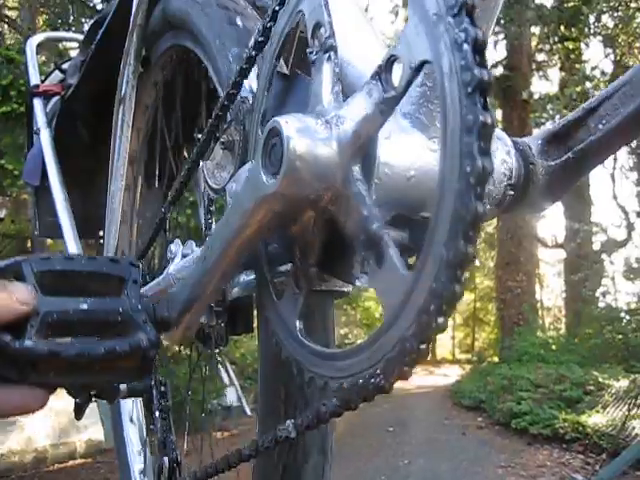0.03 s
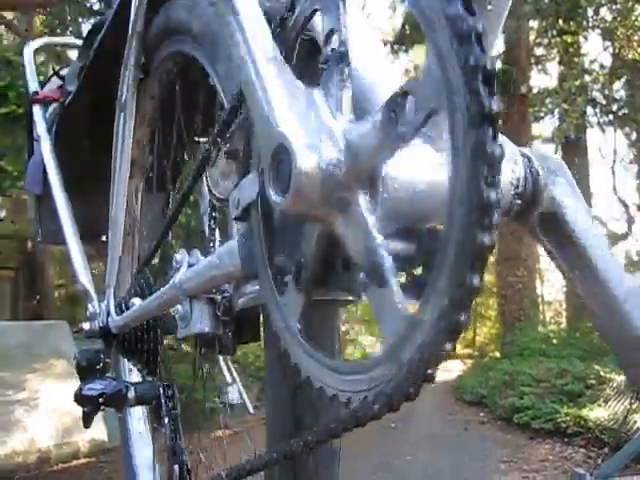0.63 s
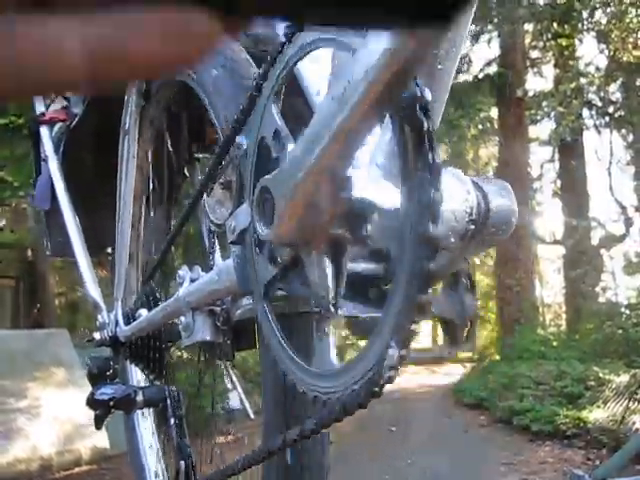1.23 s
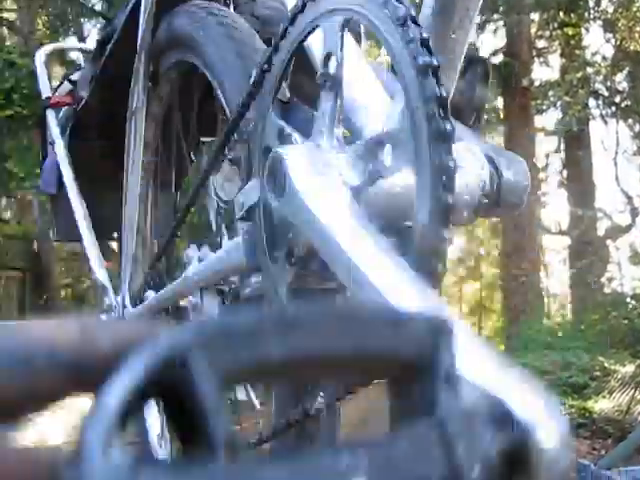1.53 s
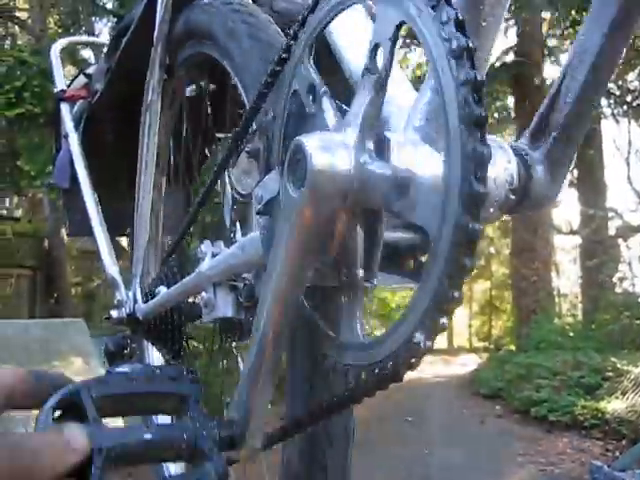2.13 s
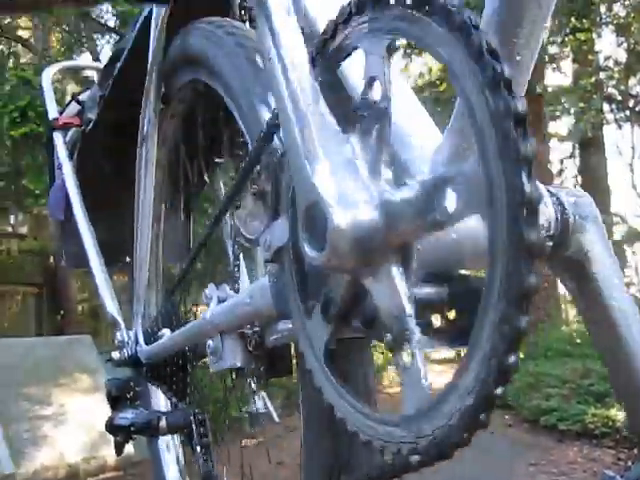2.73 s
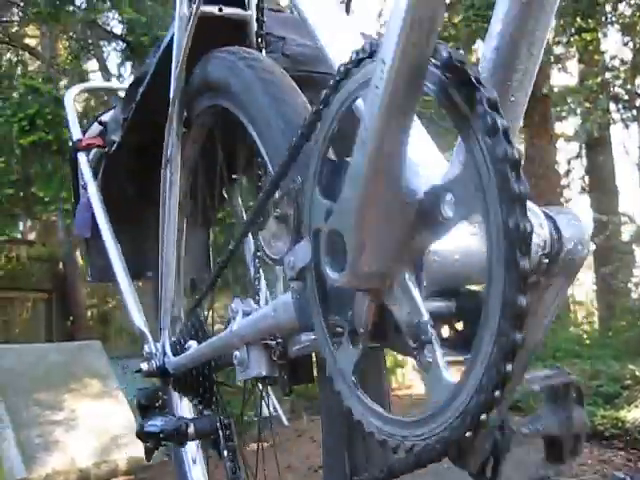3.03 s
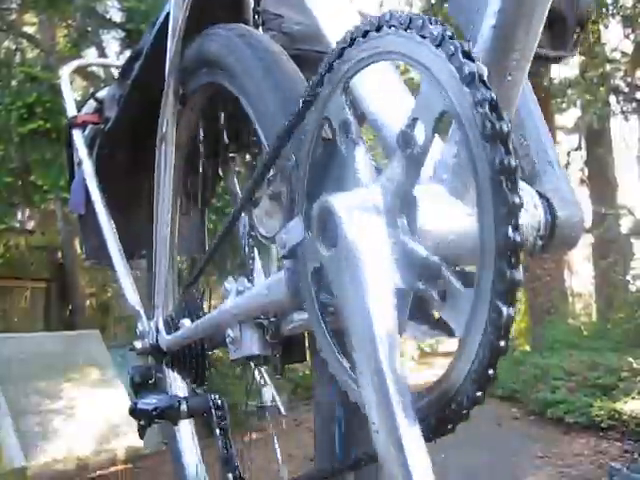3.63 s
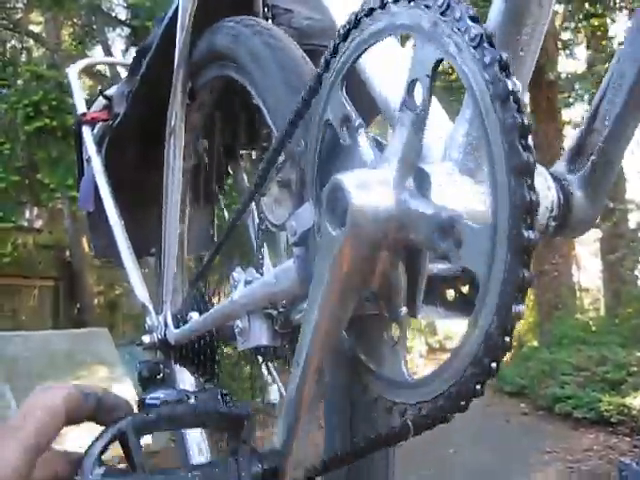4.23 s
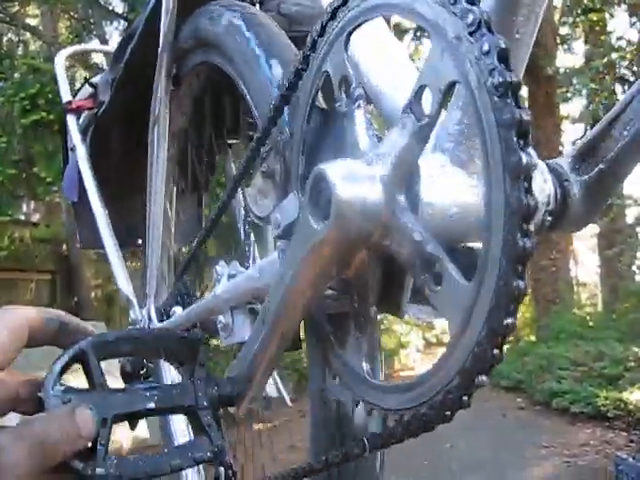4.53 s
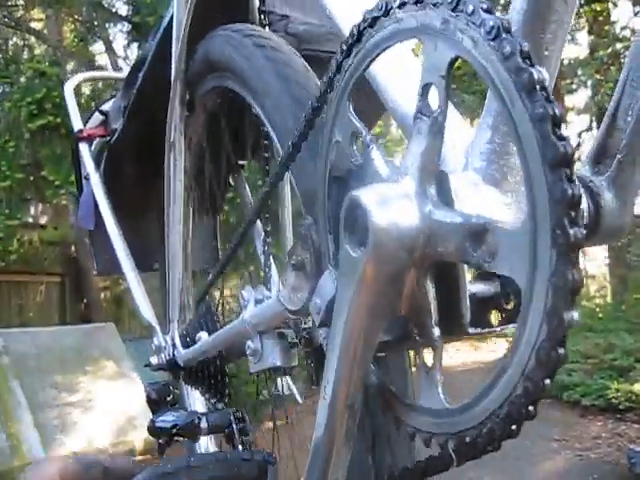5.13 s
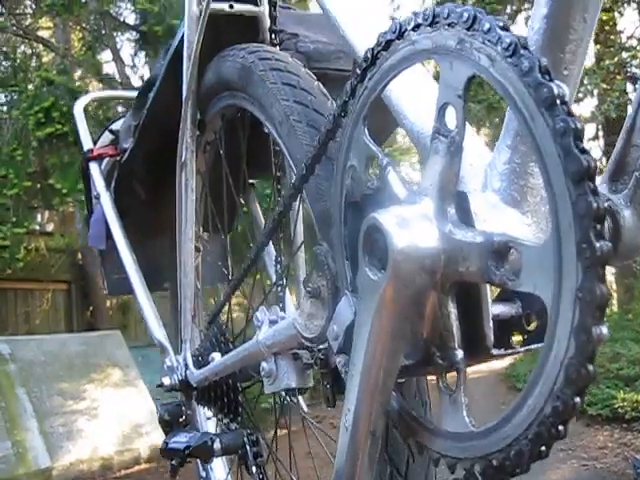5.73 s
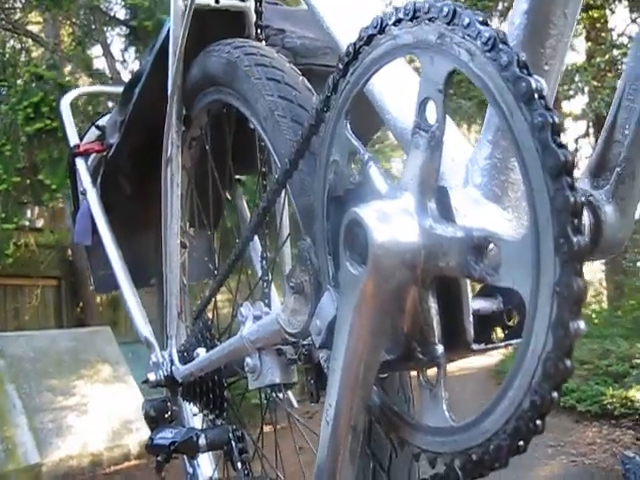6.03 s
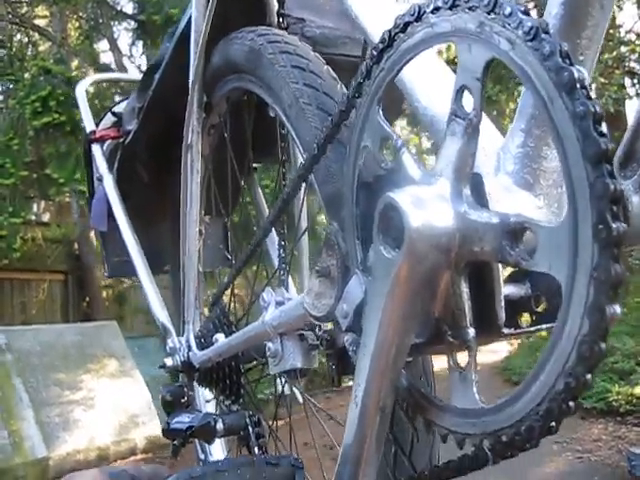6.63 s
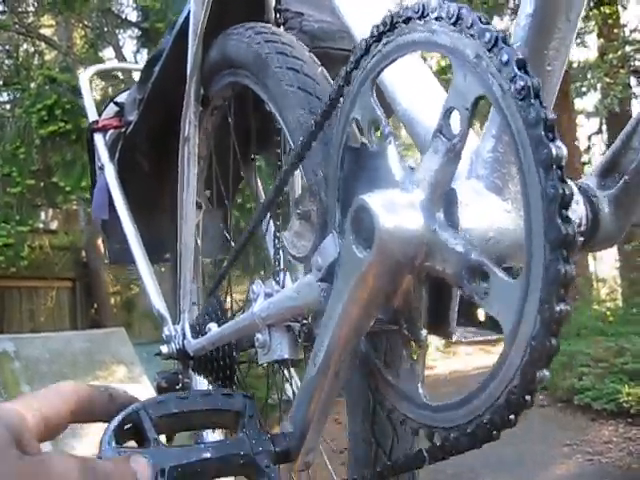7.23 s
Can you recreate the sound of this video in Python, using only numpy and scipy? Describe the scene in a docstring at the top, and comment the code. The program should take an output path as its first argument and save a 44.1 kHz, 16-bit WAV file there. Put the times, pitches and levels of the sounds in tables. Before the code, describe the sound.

A bicycle crank is turned by hand outdoors, close to the microphone. The chain hisses over the sprockets and rattles unevenly against the frame, with an occasional sharp click. It slows and stops as the freewheel snaps tooth by tooth. After a short pause the pedal gives a dry creak, the freewheel clicks again and the chain starts to creep. Soft open air lies underneath.

```python
"""A bicycle chain hisses over its sprockets and rattles the frame as a hand turns the crank.
The bicycle is on a stand, outdoors. The chain slows, and the freewheel's pawls (small spring catches)
snap over their teeth one by one. After a pause the pedal creaks under a new push, sticking and
slipping; the pawls snap again and the chain starts to creep. Soft open air lies behind it all."""
import sys
import numpy as np
from scipy import signal
from scipy.fft import rfft, irfft
from scipy.io import wavfile
from scipy.ndimage import uniform_filter1d

SR = 44100
rng = np.random.default_rng(int(sys.argv[2]) if len(sys.argv) > 2 else 0)


def log_audio(samples):
    """Write samples as a 16-bit WAV file to the path given in sys.argv[1]."""
    # one column per channel
    frames = np.atleast_2d(samples).T
    # limit to full scale, then quantise
    limited = np.clip(frames, -1, 1)
    pcm = np.round(limited * 32767).astype(np.int16)
    wavfile.write(sys.argv[1], SR, pcm)


N = 330309
T = np.arange(N) / SR

# Levels are relative: the functions add their own gains. ring_s is the time to fade by 60 dB.
# tone of the open air: pitch_hz, level_db
AIR_TONE = [(25, -6), (70, -5.5), (150, -1.5), (400, -4.5), (800, -4), (1500, -10.5), (3000, -13.5),
            (6000, -19), (10000, -20.5), (15500, -30.5)]
# the hand shifts on the pedal: start_s, level_db, length_s
GRIPS = [(4.735, -37.5, 0.032), (7.082, -34.5, 0.022)]
# tone of rubbing fingers: pitch_hz, level_db
GRIP_TONE = [(60, -40), (170, 3.5), (450, 3), (1000, 4), (2200, -2.5), (5000, -19), (16000, -39)]
# slips of the loaded pedal: start_s, level_db, focus_hz (pitch driven most), push_db (added to level)
CREAKS = [(6.5896, -20.5, 2320, -9), (6.6386, -24, 4130, 1), (6.6567, -21.5, 1510, -8),
          (6.6737, -27, 3700, -19), (6.6763, -16, 3640, -27), (6.701, -17, 3470, -12),
          (6.7036, -23, 3700, -21), (6.7228, -27, 4100, -6), (6.7247, -7, 4430, -13.5),
          (6.7289, -6, 4050, -14), (7.1182, -23, 3670, -21)]
# notes the pedal and crank ring with: pitch_hz, level_db, ring_s
PEDAL_NOTES = [(1466, 7, 0.017), (1800, -5, 0.033), (2365, 4.5, 0.0095), (2580, -0.5, 0.012),
               (2980, -13, 0.0093), (3476, -5, 0.028), (3720, 6.5, 0.0079), (4020, 9, 0.0051),
               (4590, -6, 0.013)]
# tone of the dull push on the crank: pitch_hz, level_db
PUSH_TONE = [(60, -28), (200, -24), (450, -5), (1000, -6), (1420, 7.5), (2000, -9), (5000, -36),
             (16000, -59)]
# pawls and gear teeth snap: start_s, level_db, tilt_db_per_octave, clank_hz
SNAPS = [(0.2745, -16.5, -1, 3240), (2.4033, -15.5, -2.5, 2260), (2.444, -19, 0.5, 4030),
         (3.5036, -17, -4.5, 1810), (4.9807, -18, -4, 1750), (5.0316, -16.5, -2, 1920),
         (5.4231, -20.5, -0.5, 2744), (5.4755, -34.5, -5.5, 2200), (5.586, -21, -5, 2160),
         (5.6506, -16, 3.5, 2270), (5.7253, -16.5, -0.5, 2080), (5.8019, -24, -4, 2480),
         (6.9100, -18, -1.5, 2030), (6.964, -22.5, -5, 1730), (7.1786, -15, -0.5, 2060)]
# tone of one snap: pitch_hz, level_db
SNAP_TONE = [(60, -43), (250, -29), (600, -19), (1300, -9), (2100, 0), (3400, -2), (4400, -3), (5900, 0),
             (7000, -5.5), (9300, -4), (12000, -14.5), (16000, -21)]
# notes of a pawl landing on the ratchet: pitch_hz, level_db, ring_s
PAWL_NOTES = [(1917, -2.5, 0.017), (2280, 3.5, 0.01), (3235, 0.5, 0.011), (6150, 4, 0.0047)]
# notes of the rear hub and sprockets: pitch_hz, level_db, ring_s
HUB_NOTES = [(419, -2, 0.076), (637, 0, 0.085), (861, 6.5, 0.08), (1720, 4.5, 0.1), (1840, -17, 0.088),
             (2235, -11.5, 1.25), (2910, 13, 0.033), (3380, -15, 0.045), (4020, 5.5, 0.054),
             (6140, 5, 0.055)]
# single links drop hard onto the front sprocket: start_s, level_db
LINK_DROPS = [(.861, -34), (1.511, -32.5), (2.372, -29), (3.8, -33), (4.315, -35.5), (4.371, -36),
              (4.734, -32), (4.906, -44), (7.314, -39), (7.355, -35), (7.406, -34)]
# a quick, even ticking is heard while the hiss is low: start_s, end_s, ticks_per_s
TICK_SPELLS = [(4.562, 5.16, 34.7), (7.225, 7.35, 37)]
# tone of a link settling on a tooth: pitch_hz, level_db
LINK_TONE = [(1000, -9.5), (4800, -3), (6000, 7.5), (7000, -6), (11000, 0), (12800, -6), (15000, -17)]
# the hardest knocks of slack links on the gear changer: start_s, level_db
KNOCKS = [(0.078, -26), (0.194, -28.5), (0.38, -29), (0.53, -32), (0.959, -22.5), (1.094, -26),
          (1.234, -31.5), (1.349, -27.5), (1.398, -28.5), (1.512, -25), (1.644, -28.5), (2.13, -28.5),
          (2.298, -29), (2.685, -26.5), (2.749, -26), (2.941, -22.5), (3.212, -24), (3.256, -25.5),
          (3.403, -29), (3.695, -25), (3.836, -25), (3.93, -26.5), (4.007, -21.5), (4.054, -26.5),
          (4.336, -24.5), (4.41, -28.5), (4.459, -28.5), (4.681, -23), (4.918, -26.5), (5.227, -27.5),
          (7.309, -33)]
# where the frame and gear changer ring: pitch_hz, width_hz, level_db
FRAME_PEAKS = [(178, 11.4, -3.5), (399.6, 32, -2), (614, 75, -2.5), (826, 92, -0.5), (1101, 49, 7),
               (1315, 71, 5), (1713, 206, 1), (1846, 17, 5.5), (1870, 23, 2), (2011, 130, 1), (2277, 29, 2)]
# the chain scrapes harder along a steel plate: peak_s, level_db, half_length_s
SCRAPES = [(.2, -42, .04), (0.47, -37.5, .055), (.68, -38.5, 0.056), (2.465, -36, 0.036), (2.7, -44.5, .13)]
# where that plate rings: pitch_hz, width_hz, level_db
PLATE_PEAKS = [(3923, 140, 10.5), (4260, 270, -9), (6760, 260, -5), (12100, 400, -14), (14100, 360, -13)]
# swishes as the chain slides harder: start_s, level_db, length_s
SWISHES = [(.15, -33.5, 0.051), (1.33, -39, 0.089), (1.72, -38.5, 0.086), (3.77, -40, .05),
           (4.685, -36, 0.026), (5.17, -42.5, 0.043), (6.972, -44, .02), (7.375, -36.5, 0.018)]
# tone of the chain's rubbing rollers: pitch_hz, level_db
HISS_TONE = [(100, -22.5), (170, 0), (300, -6), (1200, -10), (2600, -0.5), (3500, 0), (4400, 2),
             (7000, 0.5), (9300, -1.5), (10500, -2), (13300, -10), (14100, -15), (14800, -41),
             (16000, -1.5)]
# the chain runs, then slows to a stop: time_s, hiss_db, rattle_db
CHAIN_RUN = [(0.039, -39, -44.5), (0.32, -39, -47), (0.66, -37, -44), (0.8, -40.5, -43), (1.24, -42, -41.5),
             (1.8, -39.5, -41), (2.3, -39, -41.5), (2.49, -33.5, -39), (2.9, -39, -40.5),
             (3.23, -37, -37.5), (3.54, -40.5, -38.5), (4.0, -41, -40), (4.9, -70, -39),
             (5.24, -55.5, -41.5), (5.36, -91, -83)]
# the chain creeps on under the new push: time_s, hiss_db, rattle_db
CHAIN_CREEP = [(6.98, -49.5, -51), (7.096, -77, -57), (7.234, -58.5, -46.5), (7.32, -56, -47),
               (7.49, -43.5, -49.5)]
HISS_COLUMN, RATTLE_COLUMN = 1, 2


def amp(db):
    """Turns decibels into a gain to multiply by."""
    return 10 ** (np.asarray(db) / 20)


def unit_power(x):
    """Scales a signal to an average power of one."""
    return x / np.sqrt(np.mean(x ** 2) + 1e-20)


def add(mix, start_s, sound):
    """Mixes a sound in at the given time."""
    part = mix[round(start_s * SR):][:len(sound)]
    part += sound[:len(part)]


def colour(x, tone, size=4096):
    """Filters a sound to the given tone; white noise keeps its power."""
    hz, db = np.transpose(tone)
    bin_hz = abs(np.fft.fftfreq(size, 1 / SR)) + 1
    log_gain = np.log(amp(np.interp(np.log(bin_hz), np.log(hz), db)))
    response = np.exp(np.conj(signal.hilbert(log_gain)))  # rings after a hit, never before
    taps = np.fft.ifft(response).real[:size // 2]
    return signal.oaconvolve(x, taps / np.linalg.norm(taps))[:len(x)]


def tilted(tone, db_per_octave):
    """Leans a tone towards the treble or the bass."""
    return [(hz, db + db_per_octave * np.log2(hz / tone[0][0])) for hz, db in tone]


def at_level(hit, db, size=88):
    """Sets the level of a hit's loudest stretch, `size` samples long."""
    return amp(db) * hit / np.sqrt(uniform_filter1d(hit ** 2, size, mode="constant").max())


def wander(rate_hz):
    """A smooth random wobble, about one in size."""
    smoothing = np.exp(-(np.fft.rfftfreq(N, 1 / SR) / rate_hz) ** 2)
    return unit_power(irfft(rfft(rng.standard_normal(N)) * smoothing, N))


def swells(rows):
    """Power of bursts that rise quickly and die away."""
    power = np.zeros(N)
    for start_s, db, length_s in rows:
        age = 2 * T[:SR // 2] / length_s
        add(power, start_s, amp(db) ** 2 * age * np.exp(1 - age))
    return power


def beats(start_s, end_s, per_s, jitter):
    """Times of a steady beat, each a little early or late."""
    times = np.arange(start_s, end_s, 1 / per_s)
    return np.maximum(times + jitter * rng.standard_normal(len(times)) / per_s, 0)


def body_tone(peaks):
    """The tone of an object that rings at a few pitches."""
    hz = np.geomspace(30, 17000, num=900)
    power = sum(amp(db) ** 2 / (1 + ((hz ** 2 - pitch ** 2) / (hz * width)) ** 2)
                for pitch, width, db in peaks)
    return list(zip(hz, 10 * np.log10(power)))


def ringing(notes, t, spread_db, detune):
    """Fading notes set off by one blow; no two blows sound quite alike."""
    out = np.zeros(len(t))
    for hz, db, ring_s in notes:
        db += spread_db * rng.standard_normal()
        hz *= 1 + detune * rng.standard_normal()
        out += amp(db - 60 * t / ring_s) * np.cos(2 * np.pi * hz * t)
    return out


def chain_gain(column):
    """Strength of the hiss or the rattle over time; zero while the crank stands still."""
    spells = np.array(CHAIN_RUN), np.array(CHAIN_CREEP)
    return sum(np.interp(T, rows[:, 0], amp(rows[:, column]), left=0, right=0) for rows in spells)


def air(level_db=-52.5):
    """Soft, steady wash of the open air."""
    return amp(level_db) * colour(rng.standard_normal(N), AIR_TONE)


def hand():
    """Dull scuffs of fingers on the pedal."""
    return colour(np.sqrt(swells(GRIPS)) * rng.standard_normal(N), GRIP_TONE)


def pedal(slip_s=0.00034, scrape_db=-12, scrape_s=0.0018, focus_db_per_octave=11, push_s=0.00067,
          faint_db=-33, faint_hz=4400, faint_push_db=-24):
    """The pedal's screw thread sticks and slips; each slip rings the crank, dry and close."""
    out, t = np.zeros(N), T[:SR // 10]
    onset = 1 - np.exp(-(t / slip_s) ** 2)
    faint_times = beats(start_s=6.669, end_s=6.72, per_s=47, jitter=.08)  # the height of the creak
    faint_slips = [(s, faint_db, faint_hz, faint_push_db) for s in faint_times]
    for start_s, db, focus_hz, push_db in CREAKS + faint_slips:
        notes = [(hz, level - focus_db_per_octave * abs(np.log2(hz / focus_hz)), ring_s)
                 for hz, level, ring_s in PEDAL_NOTES]
        ring = ringing(notes, t, spread_db=0.5, detune=0.02)
        grit = np.gradient(rng.standard_normal(len(t))) * np.exp(-t / scrape_s)
        scrape = amp(scrape_db) * (focus_hz / 4000) ** 2 * grit  # faster slips are grittier
        push = colour(rng.standard_normal(len(t)) * np.exp(-t / push_s), PUSH_TONE)
        add(out, start_s, at_level((ring + scrape) * onset, db) + at_level(push, db + push_db))
    return out


def freewheel(crack_s=.0007, land_db=-5, body_db=-14, body_s=0.011, echo_db=-17, echo_s=0.0089,
              yard_db=-31, yard_s=0.048, hub_db=-24, clank_db=-3.5, clank_ring_s=0.022):
    """A pawl cracks off its tooth and lands; tooth and hub ring, and the ground and yard echo."""
    out, t = np.zeros(N), T[:SR]
    short_t = t[:SR // 20]
    age = short_t / crack_s
    onset = 1 - np.exp(-t / crack_s)
    decay = amp(body_db) * np.exp(-t / body_s) + amp(yard_db) * np.exp(-t / yard_s)
    for start_s, db, tilt, clank_hz in SNAPS:
        chatter = np.sign(rng.standard_normal(len(age))) * age * np.exp(-age ** 2 / 2)
        crack = at_level(colour(chatter, tilted(SNAP_TONE, tilt)), db - 0.5)
        pawl = ringing(PAWL_NOTES, short_t, spread_db=1, detune=.02)
        landing = at_level(pawl * (1 - np.exp(-3 * age)), db + land_db)
        tail = colour(rng.standard_normal(len(t)) * decay, tilted(SNAP_TONE, tilt - 2))  # duller
        hub = amp(hub_db) * ringing(HUB_NOTES, t, spread_db=4, detune=0.00095)
        clank = ringing([(clank_hz, clank_db, clank_ring_s)], t, spread_db=2.5, detune=.005)
        add(out, start_s, crack)
        add(out, start_s, amp(db) * (tail + (hub + clank) * onset))
        add(out, start_s + crack_s, landing)
        add(out, start_s + echo_s, amp(echo_db) * (crack + landing))  # bounce off the ground
    return out


def link_ticks(tick_s=0.0017, tick_db=1, stray_per_s=30, stray_db=-1,
               spell_db=-38.5, fade_db_per_s=13, spread_db=3):
    """Single links tick onto the teeth, with fainter stray ticks while the chain runs."""
    even_ticks = [(s, spell_db - fade_db_per_s * (s - start_s) + spread_db * rng.standard_normal())
                  for start_s, end_s, per_s in TICK_SPELLS
                  for s in beats(start_s, end_s, per_s, jitter=.03)]
    power = swells([(s, db + tick_db, tick_s) for s, db in LINK_DROPS + even_ticks])
    strays = (rng.random(N) < stray_per_s / SR) * rng.exponential(1, N)
    strays *= (amp(stray_db) * chain_gain(HISS_COLUMN)) ** 2
    power += signal.lfilter([1], [1, -np.exp(-1 / (tick_s * SR))], strays)  # each stray dies away
    return colour(np.sqrt(power) * rng.standard_normal(N), LINK_TONE)


def faint_knocks(per_s=13, above_rattle_db=9.5, spread_db=1.5):
    """Further, fainter knocks of the same kind, scattered unevenly and following the rattle's strength:
    start_s, level_db."""
    run_s, _, rattle_db = np.transpose(CHAIN_RUN)
    times = beats(run_s[0], run_s[-2], per_s, jitter=.3)
    scatter_db = spread_db * rng.standard_normal(len(times))
    return list(zip(times, np.interp(times, run_s, rattle_db) + above_rattle_db + scatter_db))


def frame_rattle(body_db=-1.14, uneven_db=2, grain_db=3, knock_db=-6, knock_s=0.0076):
    """The chain jostles its guide wheels and the frame rings; each knock is a brighter clatter."""
    tone = body_tone(FRAME_PEAKS)
    jostle = unit_power(np.sign(rng.standard_normal(N)) * amp(grain_db * wander(960)))
    strength = chain_gain(RATTLE_COLUMN) * amp(body_db + uneven_db * wander(57))
    out = colour(jostle * strength, tone)
    bright_tone = tilted(tone, db_per_octave=1)
    age = 2 * T[:SR // 8] / knock_s
    for start_s, db in KNOCKS + faint_knocks():
        clatter = colour(rng.standard_normal(len(age)) * np.sqrt(age * np.exp(-age)), bright_tone)
        add(out, start_s, at_level(clatter, db + knock_db, size=300))
    return out


def steel_plate(scrape, graze_db=-12, lean_db=-1):
    """The running chain grazes a plate with a thin sheen; leaning on it brings out its lowest note."""
    tone = body_tone(PLATE_PEAKS)
    sheen = colour(scrape * chain_gain(HISS_COLUMN) * amp(graze_db), tilted(tone, db_per_octave=7))
    lean_power = sum(amp(db) ** 2 * np.exp(-((T - s) / half_s) ** 2) for s, db, half_s in SCRAPES)
    return sheen + colour(scrape * np.sqrt(lean_power) * amp(lean_db), tone)


def shimmer(x, broad_db=1.7, fine_db=2):
    """The hiss's tone drifts in random patches as the crank turns."""
    spectrum = signal.stft(x, nperseg=1024, noverlap=768)[2]
    for depth_db, bands, frames in (broad_db, 14, 40), (fine_db, 3, 9):
        patches = uniform_filter1d(rng.standard_normal(spectrum.shape), bands, axis=0)
        patches = uniform_filter1d(patches, frames, axis=1)
        spectrum *= amp(depth_db * unit_power(patches))
    return signal.istft(spectrum, nperseg=1024, noverlap=768)[1][:N]


def chain_hiss(links_per_s=24, hiss_db=2, grain_db=2, flutter_db=1.2, link_db=0.06):
    """Countless tiny metal contacts hiss and flutter, pulsing faintly as each link meets a tooth."""
    links_passed = np.cumsum(links_per_s * (1 + 0.17 * wander(2.4))) / SR
    pulsing = amp(flutter_db * wander(58) + link_db * np.sin(2 * np.pi * links_passed))
    contacts = rng.standard_normal((2, N)) * amp(grain_db * wander(2200))
    rub, scrape = pulsing * unit_power(contacts)
    sliding = np.sqrt((chain_gain(HISS_COLUMN) * amp(hiss_db)) ** 2 + swells(SWISHES))
    return shimmer(colour(rub * sliding, HISS_TONE) + steel_plate(scrape))


def scene():
    """The bicycle and the open air, mixed into one channel."""
    return (chain_hiss() + link_ticks() + frame_rattle() + freewheel() + pedal() + hand() + air())[None]


def record(dry, limit_db=-15, recover_db_per_s=170, lag_s=0.0076, start_s=.035,
           notch_hz=7900, notch_width_hz=1700, top_hz=15780):
    """A small camera nearby dips the level after loud peaks, overloads and cuts some of the treble."""
    power_db = 10 * np.log10(abs(uniform_filter1d(dry[0] ** 2, size=88)) + 1e-12)
    recovery_db = T * recover_db_per_s
    held_db = np.maximum.accumulate(power_db + recovery_db) - recovery_db  # peaks sink back slowly
    over_db = np.maximum(held_db - limit_db, 0)
    dip_db = np.interp(T - lag_s, T, uniform_filter1d(over_db, size=200))
    x = dry[0] * amp(-dip_db) * (T > start_s)
    x = np.clip(x, -.72, .72)  # overload flattens the tallest peaks
    x = signal.lfilter(*signal.iirnotch(notch_hz, notch_hz / notch_width_hz, SR), x)
    low_pass = signal.firwin(511, top_hz, window=("kaiser", 9), fs=SR)
    return signal.oaconvolve(x, low_pass, "same")[None]


dry = scene()
out = record(dry)
log_audio(out)
```